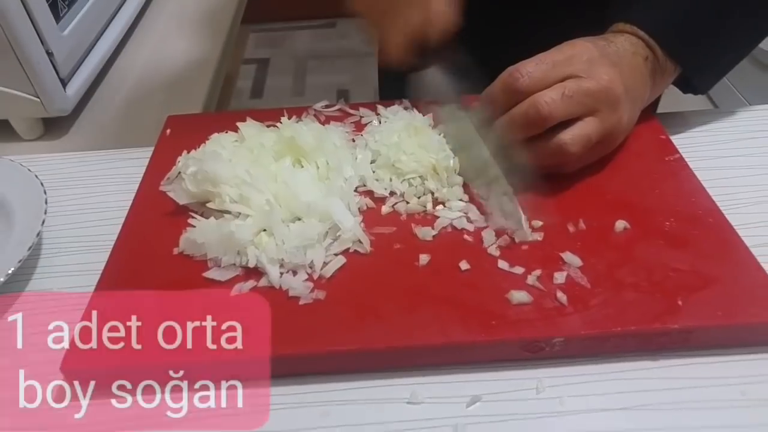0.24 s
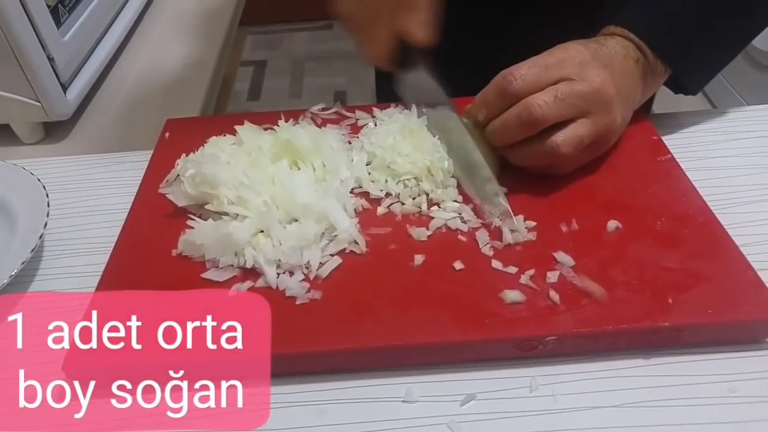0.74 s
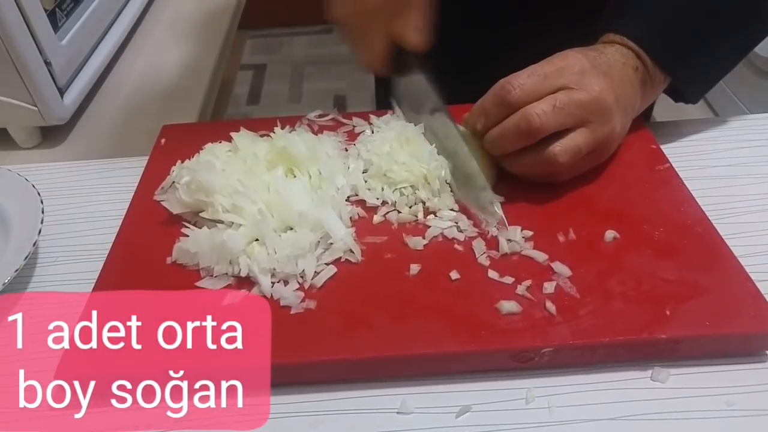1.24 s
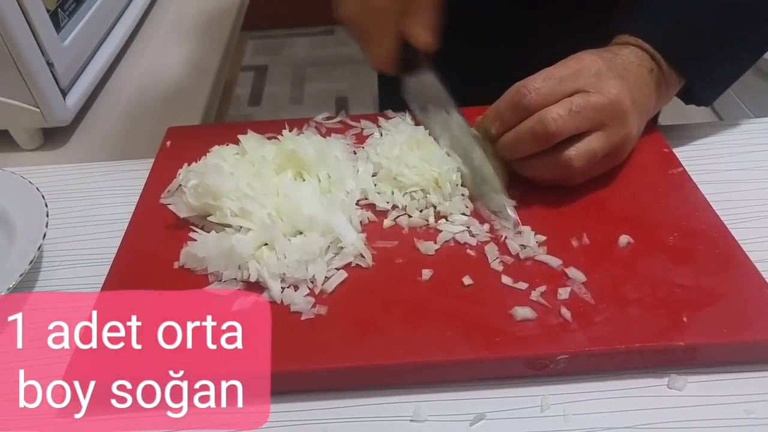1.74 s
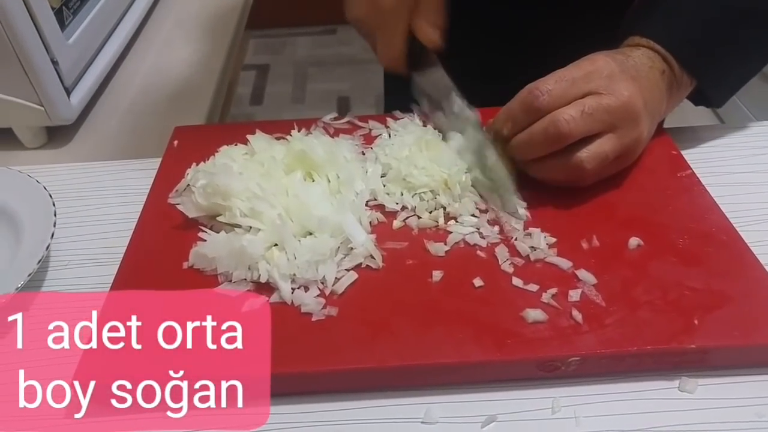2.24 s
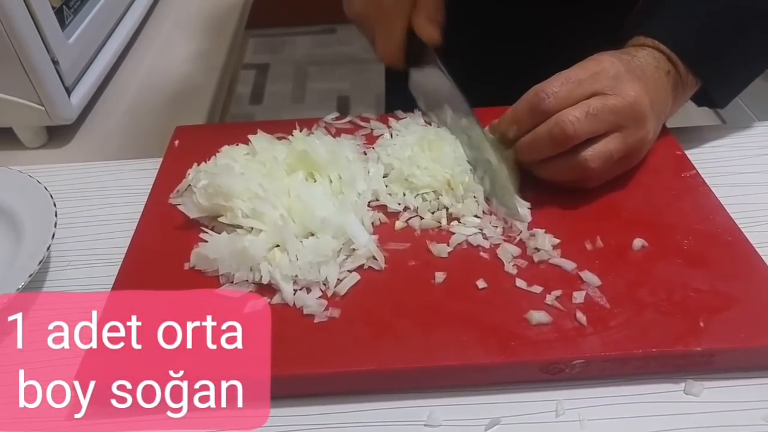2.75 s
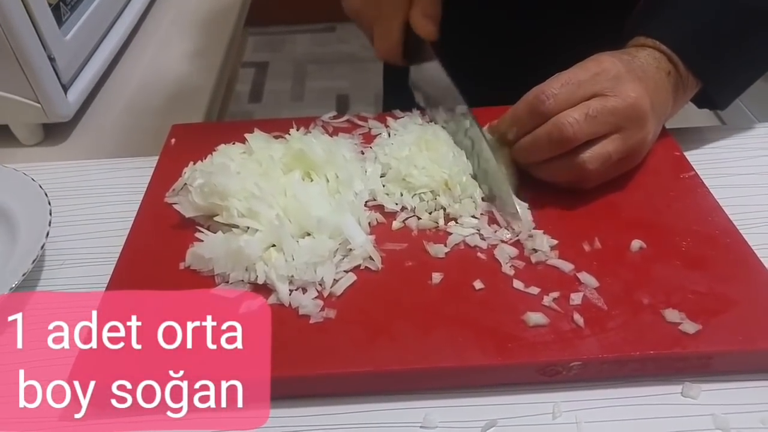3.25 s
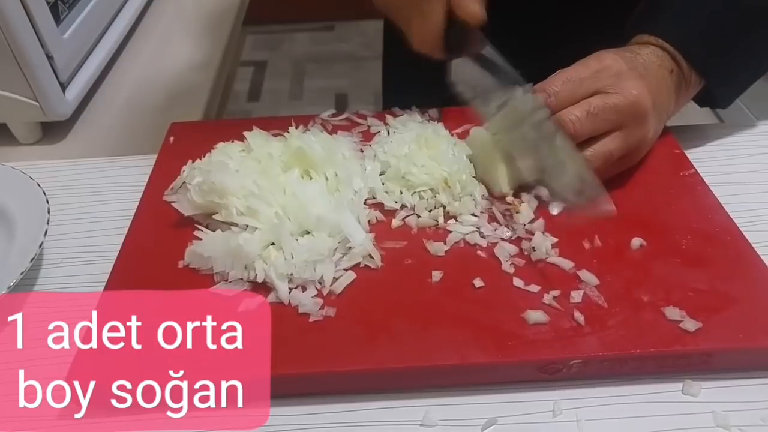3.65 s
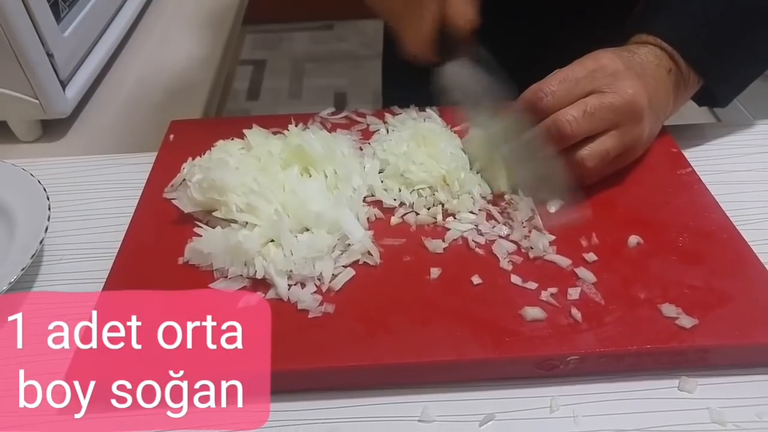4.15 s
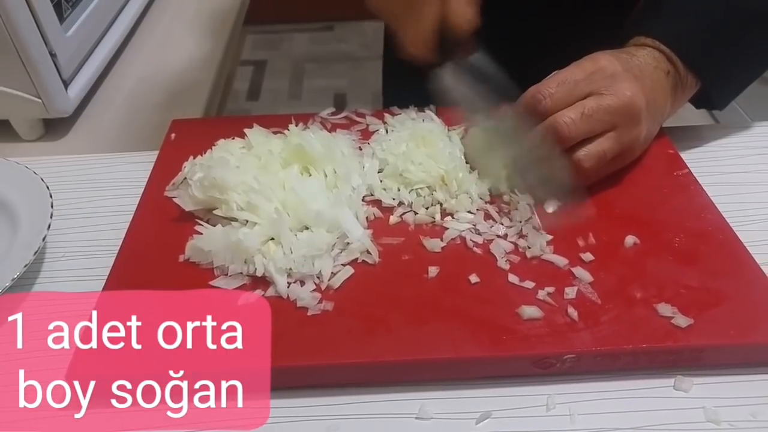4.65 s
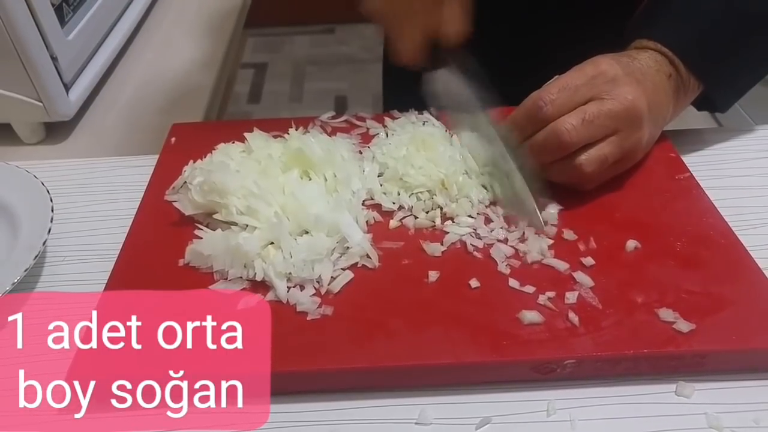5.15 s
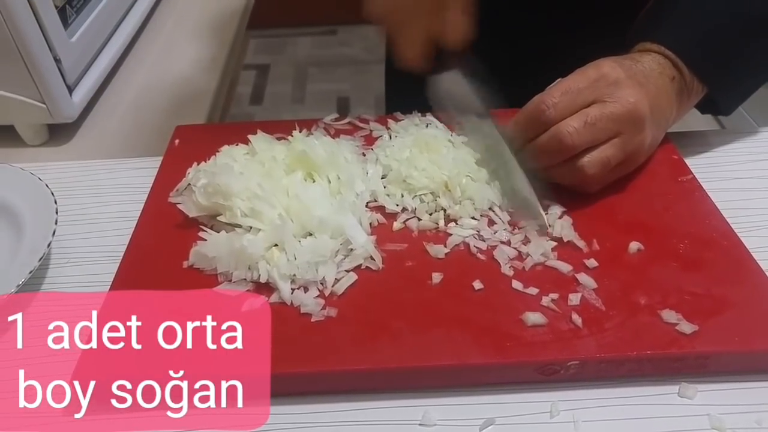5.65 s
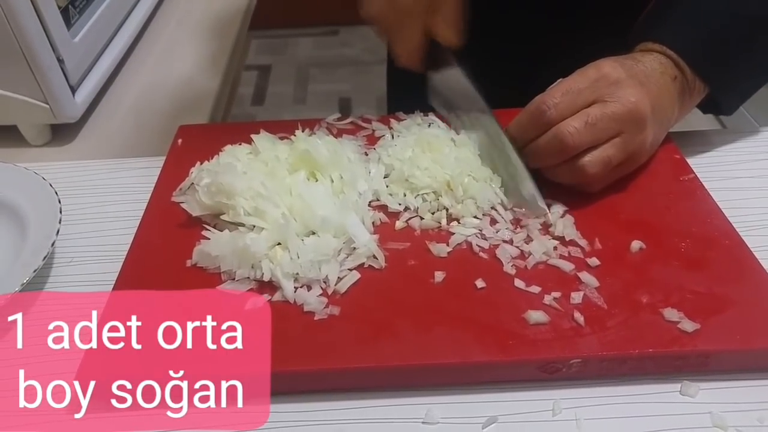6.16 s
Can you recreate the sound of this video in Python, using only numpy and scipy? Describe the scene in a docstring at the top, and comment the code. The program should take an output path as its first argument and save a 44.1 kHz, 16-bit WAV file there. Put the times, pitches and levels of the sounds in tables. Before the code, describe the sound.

A large knife chops an onion on a plastic board, with fast, even, crunchy knocks in a small kitchen.

```python
"""Out of silence comes a faint kitchen hiss, then a large knife chopping an onion, four strokes a second.
Each stroke crunches as cells burst, then knocks on a plastic board and pings the steel blade.
The impact excites the normal modes of board and table, and the small room reverberates.
A close pair of microphones, switched on just before the first stroke, rounds off the peaks."""
import sys
import numpy as np
from scipy import signal
from scipy.fft import rfft, irfft
from scipy.io import wavfile
from scipy.ndimage import uniform_filter1d

SR = 44100
rng = np.random.default_rng(int(sys.argv[2]) if len(sys.argv) > 2 else 0)


def digitize_waveform(pressure):
    """Quantize a signal to 16-bit integers and store it at the path in sys.argv[1].

    Rows of a 2-D input are taken as channels; values are limited to [-1, 1].
    """
    field = np.atleast_2d(pressure).T
    bounded = np.clip(field, -1, 1)
    quanta = np.round(bounded * 32767).astype(np.int16)
    wavfile.write(sys.argv[1], SR, quanta)


N = 282681

# Levels are relative; spectra give level per unit bandwidth.
# steady background spectrum: (frequency [Hz], level [dB])
NOISE_SPECTRUM = [(20, -13), (70, -14), (115, -15.5), (160, -2.5), (260, -17.5), (500, -18), (820, -9),
                  (1600, -20.5), (3500, -27), (5200, -22.5), (8000, -32.5), (12000, -35.5), (16000, -65)]
# knife strokes: (knock time [s], force [dB], landing hardness [dB], edge click [dB], time in onion [s])
STROKES = [(0.7189, -1, -2, -1, 0.0036), (0.9518, 0.8, 0.5, -5, 0.0076), (1.2037, 1.5, 5, 0, 0.0057),
           (1.454, 0.5, 2, -3, .006), (1.7045, 0.75, -1.5, 0, 0.029), (1.9494, 0, 4, 3, 0.033),
           (2.1977, 0, -0.5, 3.5, 0.03), (2.438, 1.6, -1, -4, 0.03), (2.682, 2.5, -0.5, 2, 0.0073),
           (2.9244, 1.9, 1.5, 2, 0.03), (3.1742, 2.5, -3.5, 5, 0.026), (3.4165, 1, 1, 0, 0.036),
           (3.656, 1.2, -2, -4, .031), (3.9104, 3, -.5, 5, 0.031), (4.1504, 1, 1.5, 4.5, 0.033),
           (4.3914, 2.1, -2, -1, 0.032), (4.6435, 2.1, 0, 1, .027), (4.89, 1.5, -1, 1.5, 0.0082),
           (5.1435, 1.8, -2, 0.5, .031), (5.3773, 0, -2, -6, 0.033), (5.6283, 1.5, 2, -0.5, 0.029),
           (5.8755, .5, -2, 0, 0.022), (6.1187, -0.7, -0.5, -2.5, 0.03), (6.3648, 1.8, -2.5, -2.5, .023)]
# the knife works towards the thick of the onion: (time [s], crunch level [dB])
ONION_THICKNESS = [(.7, -8), (1.95, -3), (2.4, 0), (3.9, 1), (6.4, 3)]
# spectrum of a bursting cell: (frequency [Hz], level [dB])
CELL_SPECTRUM = [(60, -12), (400, -2.5), (1000, 13), (1800, -3), (3000, -2.5), (5400, 4), (7600, -4),
                 (11000, -9), (14500, -16), (16000, -22)]
# the crunch starts soft and swells towards the knock: (share of the cut [0-1], level [dB])
CRUNCH_SWELL = [(0, -2), (.12, -1.5), (.3, -1.5), (1, 3)]
# the edge first bumps the board through the onion: (frequency [Hz], level [dB])
BUMP_SPECTRUM = [(100, 7), (700, -24), (1200, -3), (2200, -10), (6000, -8)]
# the board's brief modes: (frequency [Hz], level [dB], T60 [s])
BOARD_MODES = [(114.4, -24, 0.085), (243.3, -16, 0.033), (473.8, -6.5, 0.062), (587, -11, 0.077),
               (870, -0.5, 0.028), (1054, 1, 0.033), (1186, -6.5, 0.14), (1350, 0, 0.043),
               (1876, -18, 0.018), (2138, 2, 0.019), (2373, -4.5, 0.01)]
# click of the edge: (frequency [Hz], level [dB])
CLICK_SPECTRUM = [(20, 5), (150, -3), (700, 7.5), (1600, 6.5), (2300, 4.5), (3000, -9), (4200, -7.5),
                  (6000, -9.5), (8000, -29), (12000, -32), (16000, -46)]
# echoes from nearby surfaces: (left delay [s], right delay [s], gain [ratio])
REFLECTIONS = [(.0049, .0047, 0.35), (0.0096, .0099, 0.632), (0.013, .0128, 0.45), (0.0218, .0226, 0.35),
               (0.03, .0288, 0.24), (.0330, .0332, 0.15), (0.0356, .0355, 0.24)]
# long resonances of board and room together: (frequency [Hz], level [dB], T60 [s])
COUPLED_MODES = [(409, -23.5, 0.36), (484, -22.5, 0.25), (510, -20.5, 0.2), (582, -28, 0.15),
                 (700.4, -16.5, 0.21), (735, -23, 0.52), (783.7, -19, 0.31), (788, -19, 0.39),
                 (832, -15.5, 0.24), (896.6, -19, 0.43), (954.5, -24, .35), (985.5, -24.5, 0.47),
                 (1080, -23.5, 0.29), (1103, -23, 0.2), (1170.3, -19.5, 0.37), (1291, -24, 0.29),
                 (1384, -20, 0.29), (1940, -31.5, 0.41), (2070, -42, 0.16), (2370, -30.5, 0.2),
                 (2643, -27, 0.19)]
# the table's low boom: (frequency [Hz], level [dB], T60 [s])
TABLE_MODES = [(126, -33.5, 0.58), (161.2, -39.5, 0.71)]
# the blade, damped by hand and onion: (nominal frequency [Hz], level [dB], T60 [s])
BLADE_MODES = [(3485, -31.5, 0.037), (4470, -28, 0.0066), (5645, -25.5, 0.012)]
# tick of the edge catching on a tough layer: (frequency [Hz], level [dB], T60 [s])
CATCH_MODES = [(5400, -16.5, 0.0082), (6100, -19, .004)]
# the kitchen's diffuse tail: (frequency [Hz], level [dB])
REVERB_SPECTRUM = [(20, -26), (60, -21), (120, -9.5), (190, -13.5), (330, -7.5), (450, -6.5), (800, 1),
                   (1350, -1.5), (1600, -10.5), (2150, -6.5), (3100, -22.5), (5500, -28), (8000, -33),
                   (15000, -53)]
# the kitchen's reverberation time: (frequency [Hz], T60 [s])
REVERB_TIMES = [(80, 0.38), (210, 0.45), (560, 0.39), (1470, 0.39), (3900, 0.25), (10000, 0.2)]
# imbalance of the microphones: (frequency [Hz], left minus right [dB])
MIC_BALANCE = [(30, -5.5), (120, 0), (500, 0.7), (1000, -0.5), (2000, -4.5), (3000, -0.5), (5500, -8.5),
               (7500, -5), (10000, -2), (14000, 5.5)]


def amp(db):
    """Amplitude ratio of a level in decibels."""
    return 10 ** (np.asarray(db) / 20)


def unit(x):
    """Normalisation to a mean energy of one per channel."""
    return x / np.sqrt(np.mean(np.sum(x ** 2, -1)) + 1e-20)


def curve(points, hz):
    """Interpolation on a logarithmic frequency axis."""
    f, value = np.transpose(points)
    return np.interp(np.log(hz + 1), np.log(f + 1), value)


def add(mix, s, sound):
    """Superposition: a sound joins the mix at time s."""
    part = mix[..., max(round(s * SR), 0):][..., :sound.shape[-1]]
    part += sound[..., :part.shape[-1]]


def convolve(x, response):
    """Output of a linear system, cut to the length of its input."""
    return signal.fftconvolve(np.atleast_2d(x), np.atleast_2d(response), axes=1)[:, :x.shape[-1]]


def pulse(spectrum, size=4096):
    """Minimum phase: the sharpest causal pulse with the given spectrum."""
    log_gain = np.log(amp(curve(spectrum, abs(np.fft.fftfreq(size, 1 / SR)))))
    return np.fft.ifft(np.exp(np.conj(signal.hilbert(log_gain)))).real[:size // 2]


def diffuse_noise(count, mic_gap_m=0.11):
    """A diffuse field at two points is coherent in the bass and incoherent in the treble."""
    hz = np.fft.rfftfreq(count, 1 / SR)
    coherence = np.sinc(2 * hz * mic_gap_m / 343)
    a, b = rfft(rng.standard_normal((2, count)))
    return irfft(np.array([a, coherence * a + np.sqrt(1 - coherence ** 2) * b]), count)


def background(floor_db=-48):
    """Stationary diffuse noise: the kitchen's faint rumble and hiss."""
    return amp(floor_db) * convolve(diffuse_noise(N), unit(pulse(NOISE_SPECTRUM)))


def bite(cut_s, full_cut_s=0.029):
    """Depth of cut grows with cutting time: 0 on the bare board, 1 for a full slice."""
    return np.clip(cut_s / full_cut_s, 0, 1)


def crunch_level(s, cut_s, graze_db=-9):
    """Fracture level in dB rises with the onion's thickness and the depth of cut."""
    return np.interp(s, *np.transpose(ONION_THICKNESS)) + graze_db * (1 - bite(cut_s))


def onion_crunch(room, crunch_db=-38, cells_per_s=4500, spread_db=8.5, room_db=-3, after_s=0.0046):
    """Fracture as shot noise: cells burst at random, layer by layer, until just after the knock."""
    cracks = np.zeros(N)
    for s, *_, cut_s in STROKES:
        count = int((cut_s + after_s) * SR)
        depth = np.linspace(0, 1, count)
        chance, strength, sign = rng.random((3, SR // 10))[:, :count]
        layers_db = np.interp(depth, np.linspace(0, 1, 9), 3.5 * rng.standard_normal(9))
        swell_db = np.interp(depth, *np.transpose(CRUNCH_SWELL))
        sizes = amp(spread_db * np.minimum(-np.log(strength), 3) + layers_db + swell_db)
        bursts = sizes * np.sign(sign - .5) * (chance < cells_per_s / SR)
        add(cracks, s - cut_s, amp(crunch_db + crunch_level(s, cut_s)) * np.sqrt(count) * unit(bursts))
    direct = convolve(cracks, unit(pulse(CELL_SPECTRUM)))
    return direct + amp(room_db) * convolve(direct, room)


def knife_force(spot_db=1.69, bump_db=-27, graze_bass_db=-2, lean_db=2.2, bare_crack_db=5.5):
    """Impact excitation: a soft bump, then a blow that is brighter the harder and barer the contact."""
    force = np.zeros(N)
    hz = np.geomspace(60, 15000, num=48)
    bump = pulse(BUMP_SPECTRUM)
    for s, force_db, hard_db, click_db, cut_s in STROKES:
        # the arm leans on a full slice; a hard landing is a light one
        bass_db = graze_bass_db + lean_db * bite(cut_s) - .3 * hard_db
        crack_db = 1.63 * hard_db + bare_crack_db * (1 - bite(cut_s))
        colour = [(130, bass_db), (400, 0), (1250, 0.0043), (1900, hard_db), (2500, hard_db),
                  (3200, crack_db), (5500, click_db), (12000, 0.87 * click_db)]
        uneven_db = spot_db * rng.standard_normal(len(hz))  # each spot favours other modes
        add(force, s - .0003, amp(force_db) * pulse(np.c_[hz, curve(colour, hz) + uneven_db]))
        add(force, s - cut_s, amp(bump_db + crunch_level(s, cut_s)) * bump)
    return force


def modes(table, t, phases):
    """Free vibration is a sum of exponentially damped sinusoids."""
    return sum(amp(db - 60 * t / t60) * np.sin(2 * np.pi * hz * t + phase)
               for (hz, db, t60), phase in zip(table, phases))


def driven_modes(table, blow):
    """Each resonance takes its phase from the blow's spectrum at its own frequency."""
    t = np.arange(len(blow)) / SR
    phases = [np.angle(1j * np.sum(blow * np.exp(-2j * np.pi * hz * t))) for hz, _, _ in table]
    return modes(table, t, phases)


def board_knock(room, board_db=15, click_db=9, echo_db=-1, echo_click_db=-6,
                ring_db=-3, ring_rise_s=0.0079, table_db=-1, tail_db=14, left_lag_s=.00004):
    """Impulse response of the struck board: direct sound, reflections, resonances and reverberation."""
    t = np.arange(room.shape[1]) / SR
    phases = np.pi * np.arange(len(BOARD_MODES))  # neighbouring modes swing opposite ways
    board = amp(board_db) * unit(modes(BOARD_MODES, t, phases))
    click = amp(click_db) * unit(pulse(CLICK_SPECTRUM))
    response = np.zeros_like(room)
    for side, mic in enumerate(response):
        for sound, reflected_db in (board, echo_db), (click, echo_click_db):
            add(mic, (1 - side) * left_lag_s, sound)
            for *delays, gain in REFLECTIONS:
                add(mic, delays[side], amp(reflected_db) * gain * sound)
        ring = amp(ring_db) * driven_modes(COUPLED_MODES, mic) * (1 - np.exp(-t / ring_rise_s))
        boom = amp(table_db) * driven_modes(TABLE_MODES, mic)
        mic += ring + boom
    return response + amp(tail_db) * unit(convolve(room, pulse(REVERB_SPECTRUM)))


def blade_ping(room, detune=0.03, ping_db=4, bare_db=2.5, spread_db=4, catch_s=6.3503, room_db=-15):
    """Damped steel modes ring at each landing, varied by the grip; once the edge catches and ticks."""
    t, pings = np.arange(SR // 8) / SR, np.zeros(N)
    for s, _, _, click_db, cut_s in STROKES:
        shifts = 1 + detune * rng.uniform(-0.89, 1, len(BLADE_MODES))
        landing_db = .6 * click_db + bare_db * (1 - bite(cut_s))  # a clean landing rings louder
        ring_db = ping_db + landing_db + spread_db * rng.standard_normal(len(BLADE_MODES))
        gripped = [(hz * shift, db + extra_db, t60)
                   for (hz, db, t60), extra_db, shift in zip(BLADE_MODES, ring_db, shifts)]
        add(pings, s, modes(gripped, t, np.zeros(len(gripped))))
    add(pings, catch_s, modes(CATCH_MODES, t, np.zeros(len(CATCH_MODES))))
    return pings + amp(room_db) * convolve(pings, room)


def kitchen_reverb(rise_s=0.0025, size=24576):
    """Reverberation: a diffuse field builds up quickly, then each band decays at its own rate."""
    hz, frame_s, bands = signal.stft(diffuse_noise(size), SR, nperseg=256)
    decay = amp(-60 * frame_s / curve(REVERB_TIMES, hz)[:, None])
    tail = signal.istft(bands * decay, SR, nperseg=256)[1][:, :size]
    spectrum = rfft(tail)
    spectrum /= np.sqrt(uniform_filter1d(abs(spectrum) ** 2, size=50, axis=1))  # equal energy per band
    t = np.arange(size) / SR
    rise = 1 - np.exp(-(t / rise_s) ** 2)
    fade = np.clip(2 - 2 * t / t[-1], 0, 1) ** 4
    return unit(irfft(spectrum, size) * rise * fade)


def shifting_reverb(force, level_db=6, count=3):
    """Room response depends on source position: each stroke lands elsewhere and blends its own tail."""
    stroke = np.searchsorted(np.array(STROKES)[:, 0], np.arange(N) / SR + .01)
    shares = rng.standard_normal((len(STROKES) + 1, count))
    shares /= np.linalg.norm(shares, axis=1, keepdims=True)
    tails = [unit(convolve(kitchen_reverb(), pulse(REVERB_SPECTRUM))) for _ in range(count)]
    return amp(level_db) * sum(convolve(force * share[stroke], tail)
                               for share, tail in zip(shares.T, tails))


def scene():
    """All sources superpose in one room, at two microphones of unequal frequency response."""
    room, force = kitchen_reverb(), knife_force()
    knocks = convolve(force, board_knock(room)) + shifting_reverb(force)
    mix = knocks + blade_ping(room) + onion_crunch(room) + background()
    mics = [pulse([(hz, side * db / 2) for hz, db in MIC_BALANCE]) for side in (1, -1)]
    return convolve(mix, np.array(mics))


def record(dry, on_s=.607, wake_s=0.29, wake_db=-6, ceiling=0.89, low_cut_hz=45, high_cut_hz=15500):
    """Soft saturation rounds the peaks in band-limited microphones that switch on and fade up."""
    t = np.arange(N) / SR
    fade = (t > on_s) * amp(np.interp(t, [on_s, on_s + wake_s], [wake_db, 0]))
    live = fade * signal.lfilter(*signal.butter(1, low_cut_hz, "high", fs=SR), dry)
    rounded = live / (1 + (live / ceiling) ** 4) ** (1 / 4)
    lowpass = signal.firwin(255, high_cut_hz, window=("kaiser", 9), fs=SR)
    return signal.oaconvolve(rounded, lowpass[None], "same")


dry = scene()
out = record(dry)
digitize_waveform(out)
```